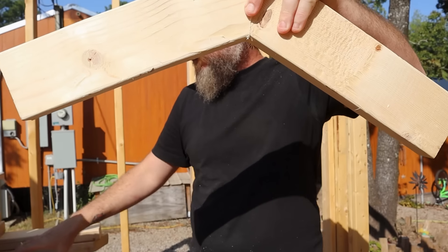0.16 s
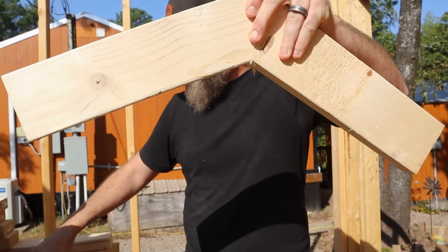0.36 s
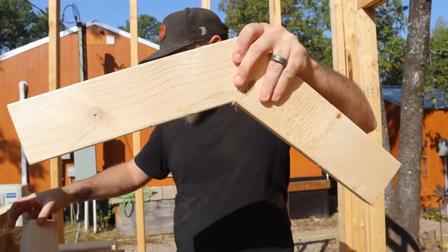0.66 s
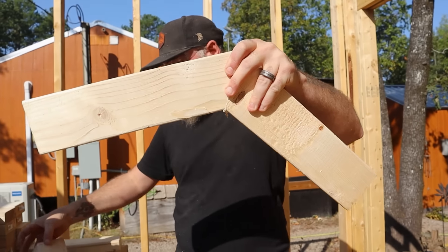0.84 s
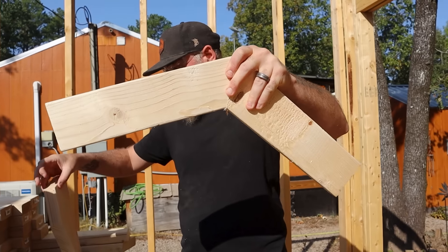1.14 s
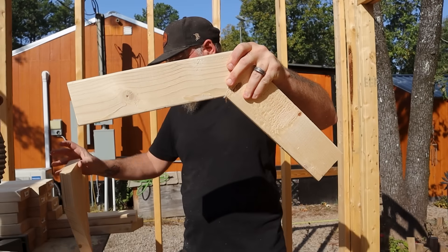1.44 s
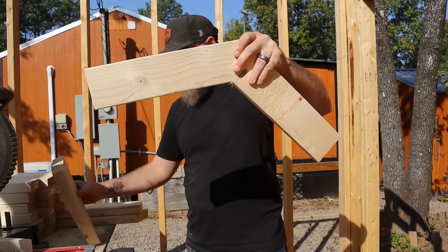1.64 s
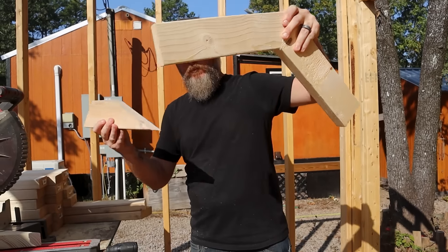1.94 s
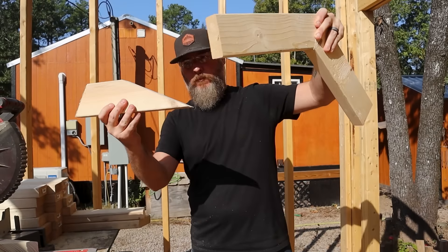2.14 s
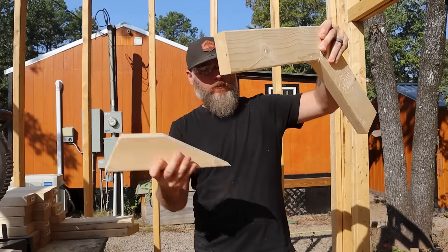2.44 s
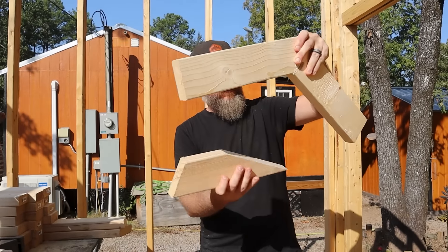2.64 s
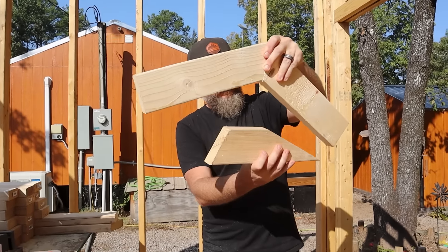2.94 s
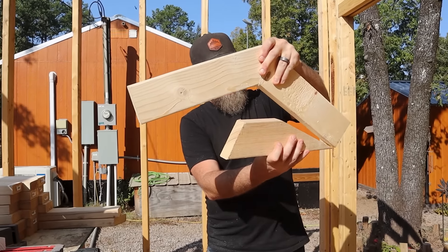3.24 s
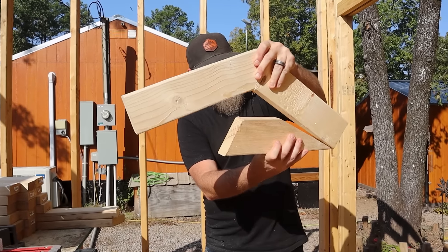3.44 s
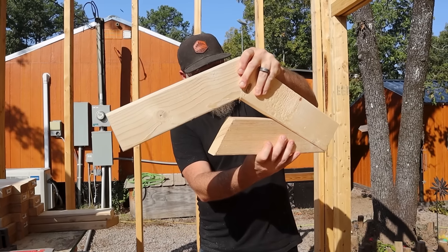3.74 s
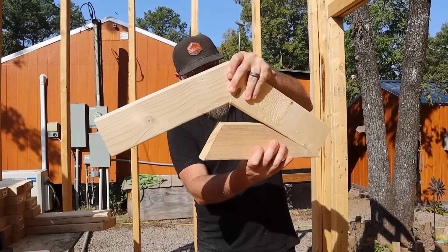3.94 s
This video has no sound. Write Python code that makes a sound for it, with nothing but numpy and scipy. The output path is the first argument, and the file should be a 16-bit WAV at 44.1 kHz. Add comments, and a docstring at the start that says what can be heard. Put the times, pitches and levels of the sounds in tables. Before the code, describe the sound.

Wooden boards knock, clatter and scrape as a piece is pulled from a stack outdoors, with a faint crow far off.

```python
"""An open timber yard. An offcut is pulled from a stack: three hard knocks and a clatter ring the boards,
then sawn faces stick and slip in scrapes and splinters tick. The pieces bump dully in the hands over
a few deep thuds, tap once and slide together.
Far off a crow calls and a small bird chirps, over a low machine hum and outdoor air."""
import sys
import numpy as np
from scipy import signal
from scipy.fft import rfft, irfft
from scipy.io import wavfile
from scipy.ndimage import uniform_filter1d

SR = 44100
rng = np.random.default_rng(int(sys.argv[2]) if len(sys.argv) > 2 else 0)


def unload_wav(signal):
    """Save mono or channel-first audio to the path in sys.argv[1] as 16-bit WAV at rate SR, clipped to [-1, 1]."""
    wavfile.write(
        sys.argv[1],
        SR,
        np.round(np.clip(np.atleast_2d(signal).T, -1, 1) * 32767).astype(np.int16),
    )


N = 180280
T = np.arange(N) / SR
TOP_HZ = 15750
MODE_SPREAD_DB = 2.4  # each contact point favours other modes


def undb(db):
    """Decibels to gain."""
    return 10 ** (np.asarray(db) / 20)


def unit_rms(x):
    """Scale to rms 1."""
    return x / np.sqrt(np.mean(x ** 2))


def unit_peak(x):
    """Scale to peak 1."""
    return x / np.abs(x).max()


def unit_onset(x):
    """Scale to rms 1 over the first 20 ms."""
    return x / np.sqrt(np.mean(x[:SR // 50] ** 2))


def add(out, start_s, x):
    """Mix x into out from start_s."""
    i = max(int(start_s * SR), 0)
    out[i:i + len(x)] += x[:max(len(out) - i, 0)]


def fade(t, t60_s):
    """Decay by 60 dB in t60_s."""
    return np.exp(-np.log(1000) * t / t60_s)


def rise(t, rise_s):
    """Exponential attack."""
    return 1 - np.exp(-t / rise_s)


def band(x, low_hz, high_hz, order=2):
    """Causal band-pass."""
    return signal.sosfilt(signal.butter(order, [low_hz, high_hz], "band", fs=SR, output="sos"), x)


def coloured(spectrum):
    """Noise of rms 1 shaped by (freq_hz, level_db) points."""
    hz, db = np.transpose(spectrum)
    bins_hz = np.fft.rfftfreq(N, 1 / SR) + 1
    gain = undb(np.interp(np.log(bins_hz), np.log(hz), db))
    return unit_rms(irfft(rfft(rng.standard_normal(N)) * gain, N))


def walk(rate_hz):
    """Smooth random drift, rms 1."""
    hold = int(SR / rate_hz)
    steps = np.repeat(rng.standard_normal(N // hold + 1), hold)
    return unit_rms(uniform_filter1d(steps, hold)[:N])


def echoes(x, t60_s, top_hz, delay_s):
    """Diffuse return from sheds and trees, passband gain near 1."""
    t = T[:SR]
    tail = band(rng.standard_normal(SR), 47, top_hz) * fade(t, t60_s) * np.clip(t / delay_s - 1, 0, 1)
    tail *= np.sqrt(2 * top_hz / SR / np.sum(tail ** 2))
    return signal.fftconvolve(x, tail)[:N]


# air spectrum: freq_hz, density_db
AIR_SPECTRUM = [(15, -33), (25, 5.5), (69, -3.5), (91, -9), (129, -1), (152, -14), (267, -11), (722, -16.5),
                (1300, -14.5), (1800, -16.5), (2360, -20), (3340, -21.5), (15500, -33)]


def air(level_db=-55, drift_db=0.5):
    """Outdoor air: steady, bass-heavy noise."""
    return coloured(AIR_SPECTRUM) * undb(level_db + drift_db * walk(5.1))


# hum tones: pitch_hz, rms_db
HUM_TONES = [(64.6, -61), (119, -68)]


def machine_hum(drift_db=2, detune=0.01436):
    """Two low machine tones waver in level and pitch."""
    out = np.zeros(N)
    for pitch_hz, rms_db in HUM_TONES:
        gain = np.sqrt(2) * undb(rms_db + drift_db * walk(4.24))
        phase = 2 * np.pi * pitch_hz * np.cumsum(1 + detune * walk(3.017)) / SR
        out += gain * np.sin(phase)
    return out


def bird_call(pitch_hz, level_db, rasp, overtone=0, flutter_db=3):
    """One rough note along a pitch curve, with an optional partial at 4/3 of it."""
    n = len(pitch_hz)
    phase = 2 * np.pi * np.cumsum(pitch_hz * (1 + rasp * walk(380)[:n])) / SR
    arch = np.sqrt(np.abs(np.sin(np.linspace(0, np.pi, n))))
    gain = arch * undb(level_db + flutter_db * walk(247.6)[:n])
    return gain * (np.sin(phase) + overtone * np.sin(phase * 4 / 3))


# chirps: start_s, pitch_hz, level_db
CHIRPS = [(2.71, 2850, -63), (2.93, 2630, -63), (3.0, 2600, -62), (3.345, 2830, -59.5), (3.415, 2625, -63),
          (3.615, 2810, -59), (3.69, 2310, -60)]


def small_bird(length_s=0.05, fall_ratio=0.304):
    """Thin, twittering, falling chirps."""
    out = np.zeros(N)
    glide = 1 - fall_ratio * np.linspace(-0.5, 0.5, int(length_s * SR))
    for start_s, pitch_hz, level_db in CHIRPS:
        add(out, start_s, bird_call(pitch_hz * glide, level_db, rasp=0.09))
    return out


# caws: start_s, length_s, partial_hz, level_db, droop_ratio
CAWS = [(0, 0.065, 673, -51, 0.17), (2.015, 0.095, 732, -56, 0.17), (2.098, 0.1, 1499, -47, 0.16),
        (2.578, 0.115, 1448, -53, 0.109), (3.075, 0.1, 1467, -49, 0.12), (3.56, 0.083, 1346, -56, 0.059)]


def crow(overtone_db=-19):
    """Hoarse, arched, distant caws, each one strong partial with a faint one above it."""
    out = np.zeros(N)
    for start_s, length_s, partial_hz, level_db, droop_ratio in CAWS:
        arch = 1 - droop_ratio * np.linspace(-0.9, 1.1, int(length_s * SR)) ** 2
        add(out, start_s, bird_call(partial_hz * arch, level_db, rasp=0.024, overtone=undb(overtone_db)))
    return out


# ground thuds: start_s, level_db
THUDS = [(0.201, -39), (0.236, -32), (3.480, -37.5)]


def thuds(pitch_hz=61, t60_s=0.24, rise_s=0.0017):
    """Deep, quickly damped swings, as of feet shifting on the ground."""
    out, t = np.zeros(N), T[:SR]
    thud = np.sin(2 * np.pi * pitch_hz * t) * fade(t, t60_s) * rise(t, rise_s)
    for start_s, level_db in THUDS:
        add(out, start_s, undb(level_db) * thud)
    return out


# cloth spectrum: freq_hz, density_db
CLOTH_SPECTRUM = [(20, -22), (60, 0), (120, 0), (190, 0.5), (300, -15.5), (700, -26), (3000, -38),
                  (15000, -58)]


def sleeve(booms, reach_db=-52.5, reach_end_s=2.41, release_s=0.2, swell_db=-5.5, swell_s=0.036):
    """Low cloth rustle: steady while the arm reaches, swelling as it takes up each bump."""
    rustle = coloured(CLOTH_SPECTRUM)
    reach = undb(reach_db) * np.clip(1 - (T - reach_end_s) / release_s, 0, 1)
    step = 1 / (swell_s * SR)
    swell = undb(swell_db) * np.sqrt(signal.lfilter([step], [1, step - 1], booms ** 2))
    flutter = undb(2.5 * walk(24.77))
    return rustle * np.hypot(reach, swell) * flutter


# held board modes: freq_hz, level_db, base_t60_s
HELD_MODES = [(62.8, -11, 0.76), (82, -4.5, 0.24), (96.5, -3, 0.47), (140.4, -11, 0.31), (175.2, 1.5, 0.18),
              (213.8, -5, 0.26), (329, -7, 0.14), (402, -4, 0.12)]
# palm bumps: start_s, level_db, cutoff_hz
BUMPS = [(0.1, -29, 279), (0.136, -34.5, 280), (0.468, -32.5, 220), (0.536, -35, 170), (.715, -32.5, 230),
         (0.869, -30, 230), (.91, -26.5, 250), (1.075, -29.5, 242), (1.334, -31.5, 120), (1.431, -42, 202),
         (2.01, -28.5, 260), (2.089, -24.5, 276), (2.126, -36, 233), (2.335, -40, 190), (2.450, -43, 170)]


def bumps(jolt_db=-21.5, jolt_db_per_db=0.35, jolt_lag_s=0.014, jolt_cutoff_hz=120, rise_s=0.0018):
    """Palms, and the jolt of each knock, push slowly on the held board and move its lowest modes."""
    out, t = np.zeros(N), T[:SR]
    pushes = [(start_s, undb(level_db), cutoff_hz) for start_s, level_db, cutoff_hz in BUMPS]
    for start_s, level_db, low_hz, *_ in KNOCKS:
        reach = 1 / (1 + (low_hz / 190) ** 4)  # blows without bass hardly reach the hand
        gain = reach * undb(jolt_db + jolt_db_per_db * level_db)
        pushes.append((start_s + jolt_lag_s, gain, jolt_cutoff_hz))
    for start_s, gain, cutoff_hz in pushes:
        boom = ring(HELD_MODES, t, low_hz=44, cutoff_hz=cutoff_hz, t60_scale=0.8) * rise(t, rise_s)
        add(out, start_s, gain * unit_peak(boom))
    return out


def wood(force, resonances, tilt_db_per_oct):
    """Small contact forces ring the stiff, high resonances of the timber."""
    out = 0
    for freq_hz, width_hz, level_db in resonances:
        peak = signal.iirpeak(freq_hz, freq_hz / width_hz, SR)
        gain = undb(level_db + tilt_db_per_oct * np.log2(freq_hz / resonances[0][0]))
        out += gain * signal.lfilter(*peak, signal.lfilter(*peak, force))  # twice, for deep valleys
    return out


def stroke(resonances, half_length_s, tilt_db_per_oct, rough_db, catch_db=0, slip_hz=700):
    """Sawn faces stick and slip, and fibres catch: dense uneven clicks that swell and die away."""
    n = int(2 * half_length_s * SR)
    slips = undb(rough_db * rng.standard_normal(N // 10))[(T[:n] * slip_hz).astype(int)]
    catches = undb(catch_db * np.minimum(rng.exponential(size=N)[:n], 7))
    force = rng.standard_normal(N)[:n] * slips * catches
    return np.hanning(n) * unit_rms(wood(force, resonances, tilt_db_per_oct))


def touched(modes, detune):
    """Each contact lands elsewhere on the board and shifts the pitch and level of its modes."""
    return [(hz * np.exp(detune * rng.standard_normal()),
             db + MODE_SPREAD_DB * rng.standard_normal(), damping) for hz, db, damping in modes]


# sliding offcut resonances: freq_hz, width_hz, level_db
SLIDE_RESONANCES = [(1390, 380, -6), (1940, 260, -4), (3392, 110, -1), (3540, 500, 0), (5010, 160, -2),
                    (5560, 800, -8.5), (5990, 710, -8.5), (9800, 1300, -17), (10700, 360, -13.5),
                    (11900, 1500, -16.5)]


def slide(centre_s=3.878, half_length_s=0.07, level_db=-46.5):
    """The offcut slides smoothly into place."""
    out = np.zeros(N)
    rub = stroke(SLIDE_RESONANCES, half_length_s, tilt_db_per_oct=-0.5, rough_db=2)
    add(out, centre_s - half_length_s, undb(level_db) * rub)
    return out


# binding offcut resonances: freq_hz, width_hz, level_db
SQUEAK_RESONANCES = [(1405, 76, -5), (2100, 49, -1)]


def squeak(centre_s=0.645, half_length_s=0.055, level_db=-50):
    """The offcut binds and sings just before it jerks free."""
    out = np.zeros(N)
    rub = stroke(SQUEAK_RESONANCES, half_length_s, tilt_db_per_oct=2, rough_db=1)
    add(out, centre_s - half_length_s, undb(level_db) * rub)
    return out


# broad resonances of rubbed wood: freq_hz, width_hz, level_db
GRAIN = [(1280, 1250, 4.5), (1992, 170, 9.5), (2543, 480, 5.5), (3390, 930, 6), (4107, 850, 4.5),
         (4744, 560, 1), (5490, 1350, 0.5), (8010, 3200, -12.5), (10020, 5300, -7)]
# narrow rings of the dry offcut: freq_hz, width_hz, level_db
DRY_RINGS = [(2107, 130, 4), (2550, 70, -1), (3600, 150, 2.5), (5016, 220, -0.5), (5950, 74, -2.5)]
# scrapes: centre_s, half_length_s, level_db, tilt_db_per_oct
SCRAPES = [(0.022, 0.032, -51.5, -20), (0.106, 0.072, -49.5, 0.6), (0.519, 0.095, -46.5, -1.5),
           (0.591, 0.04, -56, -1), (0.65, 0.053, -48.5, 4), (0.852, 0.055, -45, -0.5),
           (1.037, 0.073, -56, -1.5), (1.217, 0.086, -50, -25), (1.307, 0.017, -44.5, 8),
           (1.454, 0.082, -52.5, -5.5), (1.601, 0.038, -51.5, 1.2), (1.731, 0.056, -52, 3),
           (1.816, 0.016, -56, 4), (2.021, 0.11, -54.5, 0), (2.362, 0.07, -59.5, 1),
           (2.472, 0.051, -49.5, 3), (2.655, 0.13, -60.5, 2)]


def scrapes(judder_db=2, judder_hz=109.9):
    """Boards drag over the stack in uneven tugs and turn in the hand."""
    out = np.zeros(N)
    for centre_s, half_length_s, level_db, tilt_db_per_oct in SCRAPES:
        resonances = touched(GRAIN, detune=0.028) + DRY_RINGS
        rub = stroke(resonances, half_length_s, tilt_db_per_oct, rough_db=0.3, catch_db=4)
        add(out, centre_s - half_length_s, undb(level_db) * rub)
    return out * unit_rms(undb(judder_db * walk(judder_hz)))


# splinter resonance: freq_hz, width_hz, level_db
SPLINTER_RING = [(13500, 2900, -14.5)]
# splinter ticks: start_s, peak_db, tilt_db_per_oct
TICKS = [(0.701, -42.5, 4), (.867, -35.5, 4), (.92, -43, 2.5), (1.046, -38, -1), (1.063, -38.5, 1),
         (1.187, -41, 5), (1.228, -48, 8), (1.3, -36, 2), (1.310, -32.5, 1.5), (1.45, -49, 9),
         (1.472, -43.5, 3.5), (1.487, -44.5, 7), (1.519, -44, 4), (1.642, -44, 3), (1.745, -39.5, 1),
         (1.777, -48, 2)]


def splinters(t60_s=0.016, rise_s=0.0014):
    """Each splinter snaps free with a short bright crackle."""
    out, t = np.zeros(N), T[:SR // 10]
    for start_s, peak_db, tilt_db_per_oct in TICKS:
        force = rng.standard_normal(len(t)) * fade(t, t60_s) * rise(t, rise_s)
        tick = wood(force, GRAIN + DRY_RINGS + SPLINTER_RING, tilt_db_per_oct)
        add(out, start_s, undb(peak_db) * unit_peak(tick))
    return out


def ring(modes, t, low_hz, cutoff_hz, t60_scale):
    """Struck modes, peak 1: a soft contact misses the high ones, a light end the low ones."""
    hz, db, t60_s = np.transpose(modes)[:, :, None]
    gain = undb(db) / np.sqrt((1 + (hz / cutoff_hz) ** 4) * (1 + (low_hz / hz) ** 4))
    return unit_peak(np.sum(gain * np.sin(2 * np.pi * hz * t) * fade(t, t60_s * t60_scale), axis=0))


def chatter(blow, t, rebound=0.4, first_gap_s=0.0058, gap_ratio=1.35, count=3):
    """A blow, then ever weaker landings at uneven, widening gaps."""
    gaps_s = first_gap_s * gap_ratio ** np.arange(count) * undb(0.84 * rng.standard_normal(count))
    return blow + sum(rebound ** k * np.interp(t - lag_s, t, blow, left=0)
                      for k, lag_s in enumerate(np.cumsum(gaps_s), start=1))


def fibre_crack(t, contact, crackle_t60_s=0.04, snap_t60_s=0.0097, snap_db=-5):
    """The edge that lands first snaps; the fibres crackle after it."""
    crackle_force = rng.standard_normal(len(t)) * contact * fade(t, crackle_t60_s)
    snap_force = rng.standard_normal(len(t)) * fade(t, snap_t60_s)
    crackle = wood(crackle_force, GRAIN + DRY_RINGS, tilt_db_per_oct=-1.2)
    snap = wood(snap_force, GRAIN, tilt_db_per_oct=0.89)
    return unit_peak(crackle) + undb(snap_db) * unit_peak(snap)


# stacked board modes: freq_hz, level_db, base_t60_s
STACK_MODES = [(96.7, 0.5, 1), (178, -7, 0.69), (213.2, -6.5, 0.81), (303.5, -4, 0.27), (363, 0.5, 0.12),
               (424, -1.5, 0.067), (497, 2, 0.072), (558, 4, 0.15), (619, -4, 0.16), (828.5, 1, 0.15),
               (883, 7, 0.039), (1032, -6.5, 0.23), (1146, -5.5, 0.15), (1340, 2, 0.087), (1406, -3, 0.12),
               (1480, -3, 0.18), (1700, -22, 0.19)]
# board on board: start_s, level_db, low_hz, cutoff_hz, t60_scale, crack_db, slap_hz, slap_db
KNOCKS = [(0.057, -33, 60, 330, 1.1, -8.5, 125, 3), (.104, -37.5, 149, 724, 0.98, -12, 310, -17),
          (0.4176, -21.5, 134, 656, 0.29, -26, 291, -8), (0.4203, -21, 192, 704, 0.57, -25, 610, -0.5),
          (0.4344, -30.5, 390, 740, 0.63, -18, 782, -6), (0.6695, -20, 124, 594, 0.47, -13, 593, -8),
          (0.6737, -18.5, 139, 620, 0.49, -16, 348, -8.5), (.8208, -16.5, 172, 736, 0.43, -13.5, 539, -5.5),
          (.8250, -17.5, 220, 716, 0.44, -17, 451, -6), (0.834, -25.5, 229, 480, 0.26, -5, 335, 3),
          (.8410, -35.5, 1190, 1620, 0.59, -11, 1440, -2), (0.8476, -29.5, 280, 705, 0.4, -16, 425, -8),
          (0.8648, -27, 150, 600, 0.54, -10.5, 602, -10.5), (0.896, -31.5, 120, 520, 0.45, -24, 315, 2.5),
          (1.0190, -35.5, 233, 1050, 0.28, -4, 458, -1), (1.0357, -30.5, 89, 380, 0.35, -13, 208, -2),
          (1.0560, -33, 100, 443, 0.42, -10, 382, -13), (1.102, -39, 151, 676, 0.44, 3.5, 330, -13),
          (1.309, -31.5, 160, 336, 0.36, -5.5, 225, -6.5), (1.9020, -47.5, 180, 455, 0.73, -20, 310, -27),
          (2.329, -51, 178, 543, 1.65, -18, 390, -12), (3.3838, -47, 244, 1440, 0.26, -3.5, 520, -23)]


def knocks(thud_db=-3, slap_t60_s=0.046, rattle_db=-11, rattle_base_t60_s=0.16, contact_cycles=0.82):
    """Each blow thuds, rings the boards, rebounds, slaps the faces, rattles the stack and cracks."""
    out, t = np.zeros(N), T[:SR]
    for start_s, level_db, low_hz, cutoff_hz, t60_scale, crack_db, slap_hz, slap_db in KNOCKS:
        contact = 1 - np.exp(-(t * cutoff_hz / contact_cycles) ** 2)  # softwood gives, then pushes back
        high_hz = max(0.84 * cutoff_hz, low_hz + 100)
        boards = ring(touched(STACK_MODES, detune=0.0095), t, low_hz, cutoff_hz, t60_scale)
        thud = band(signal.unit_impulse(SR), 0.73 * low_hz, high_hz, order=4)  # the whole board stops
        slap = contact * np.sin(2 * np.pi * slap_hz * t) * fade(t, slap_t60_s)
        blow = contact * unit_onset(boards) + undb(thud_db) * unit_onset(thud)
        body = unit_onset(chatter(blow, t)) + undb(slap_db) * unit_onset(slap)
        body = band(body, 0.58 * low_hz, TOP_HZ)  # a narrow board radiates little bass
        rattle = band(rng.standard_normal(SR), low_hz, high_hz, order=4)
        rattle *= contact * fade(t, rattle_base_t60_s * t60_scale)
        crack = fibre_crack(t, contact)
        knock = unit_onset(body) + undb(rattle_db) * unit_onset(rattle) + undb(crack_db) * crack
        add(out, start_s, undb(level_db) * knock)
    return out


def scene():
    """Close timber with a faint yard echo; far birds through the trees. Mono."""
    booms = bumps()
    timber = knocks() + booms + scrapes() + squeak() + slide() + splinters()
    birds = crow() + small_bird()
    near = timber + undb(-17.5) * echoes(timber, t60_s=0.41, top_hz=5600, delay_s=0.0092)
    far = birds + undb(-4.5) * echoes(birds, t60_s=0.98, top_hz=5000, delay_s=0.0042)
    return (near + far + thuds() + sleeve(booms) + air() + machine_hum())[None]


def record(dry, ceiling=0.44):
    """Soft peak limit, then a steep low-pass."""
    limited = dry / (1 + (dry / ceiling) ** 4) ** 0.25
    return signal.sosfilt(signal.ellip(10, 0.1, 70, TOP_HZ, fs=SR, output="sos"), limited)


dry = scene()
out = record(dry)
unload_wav(out)
```